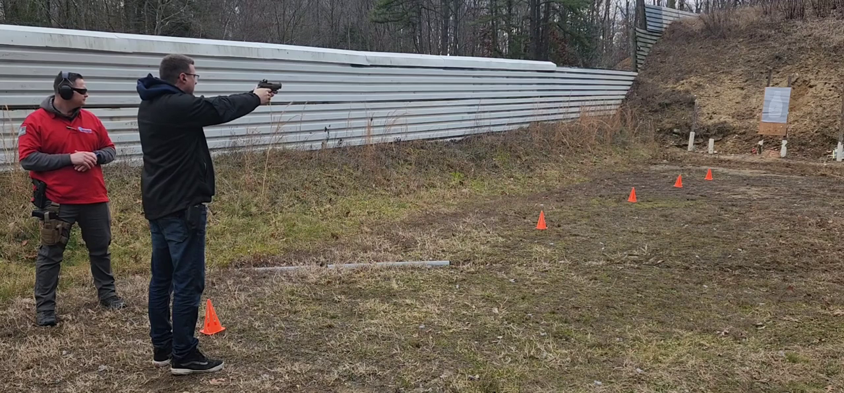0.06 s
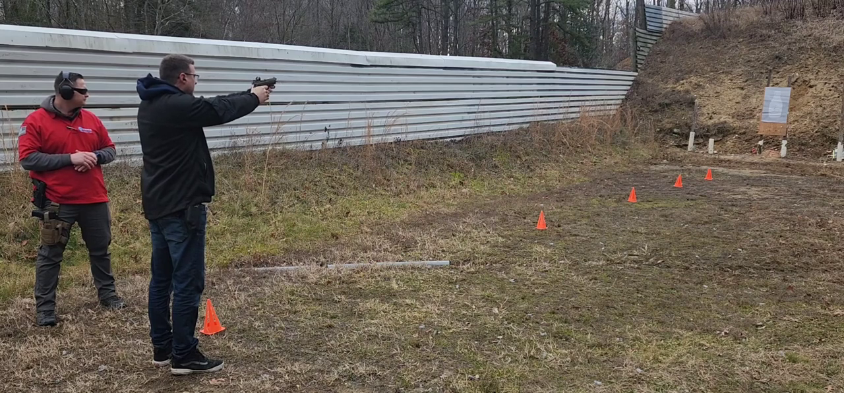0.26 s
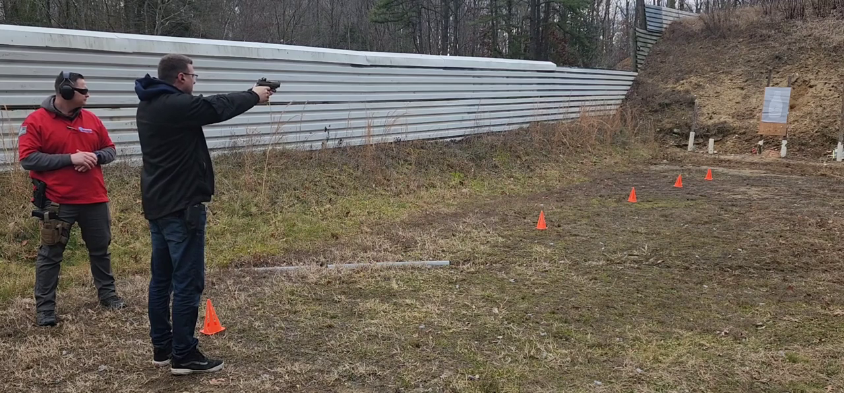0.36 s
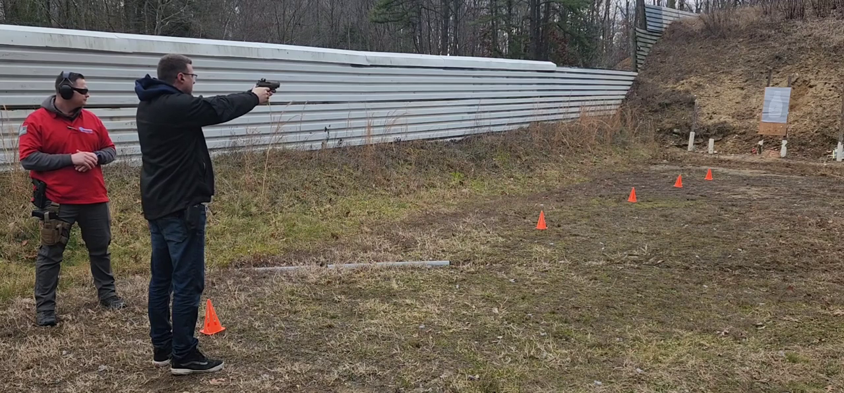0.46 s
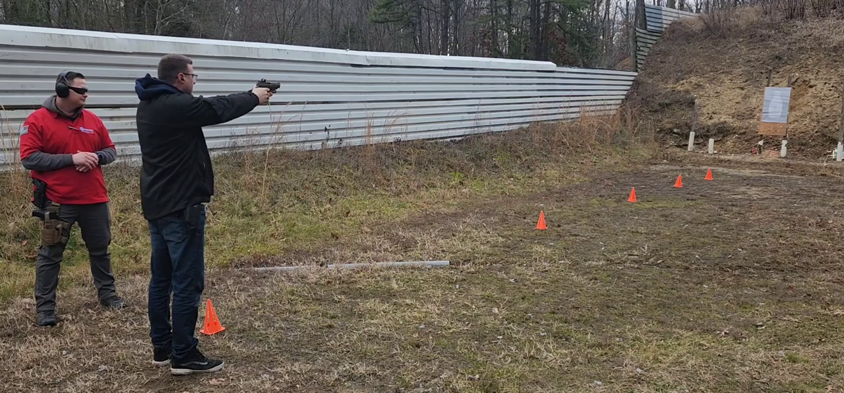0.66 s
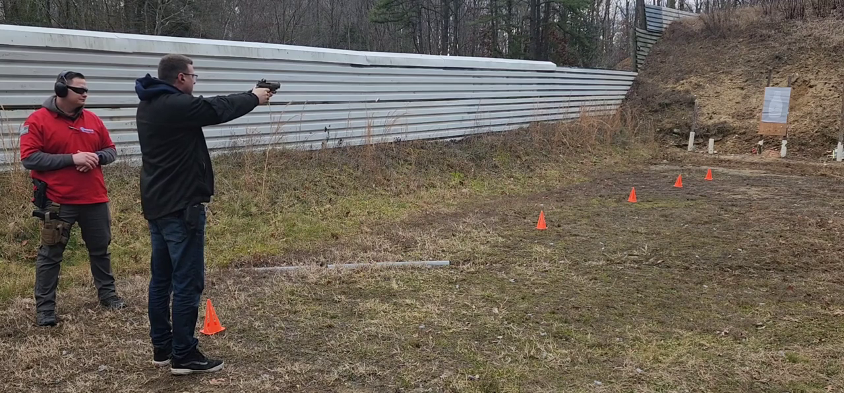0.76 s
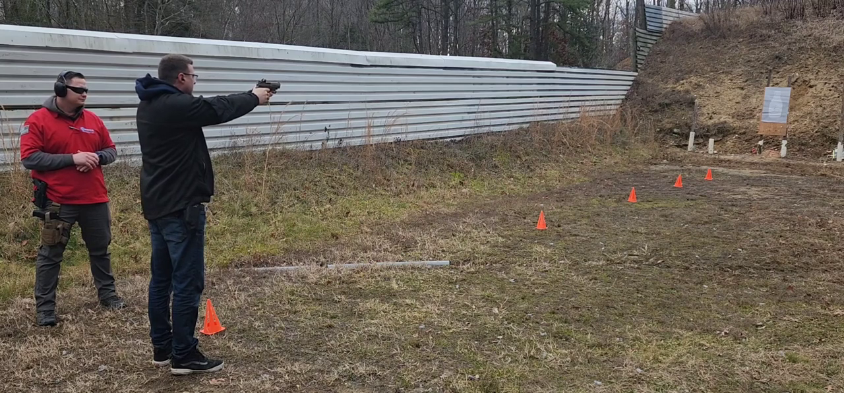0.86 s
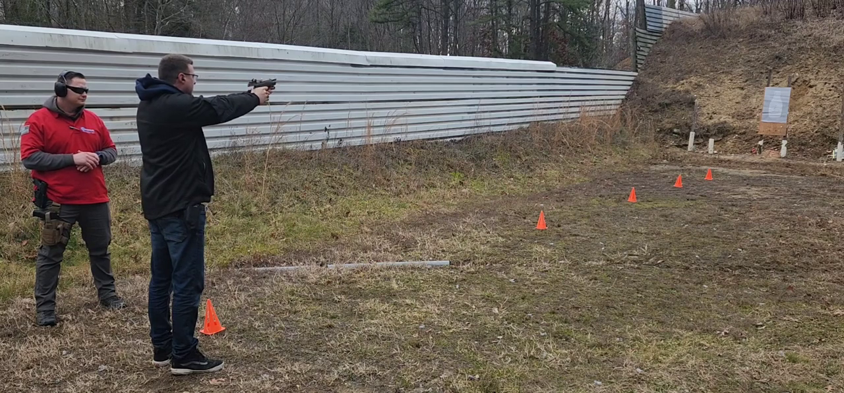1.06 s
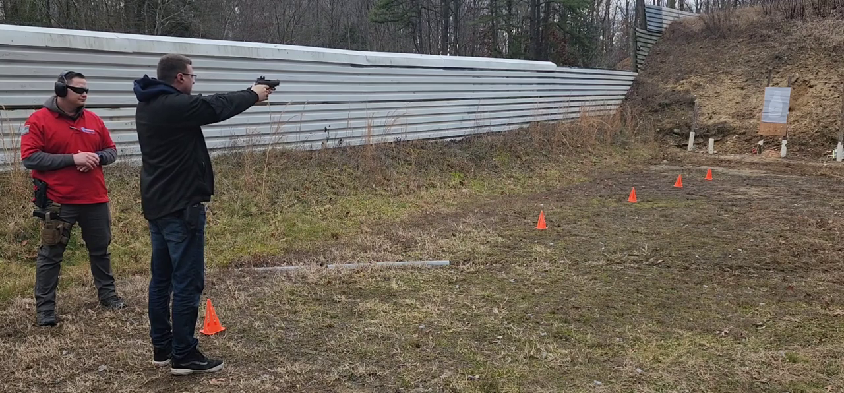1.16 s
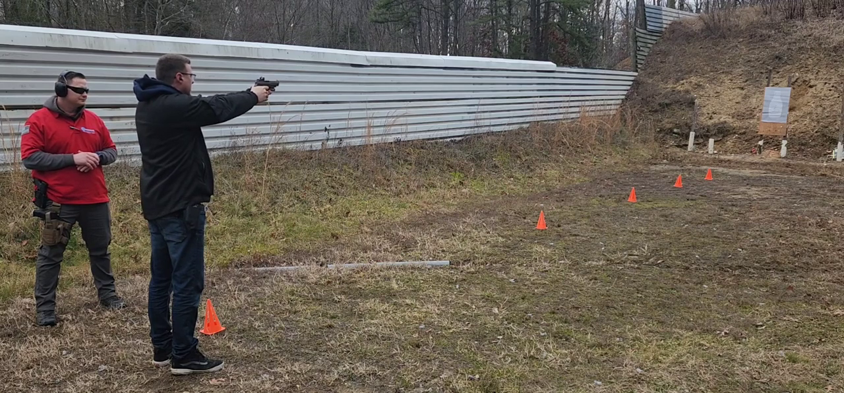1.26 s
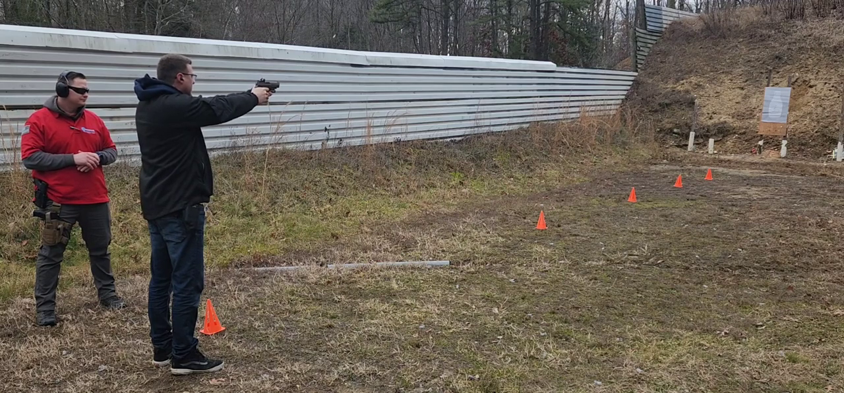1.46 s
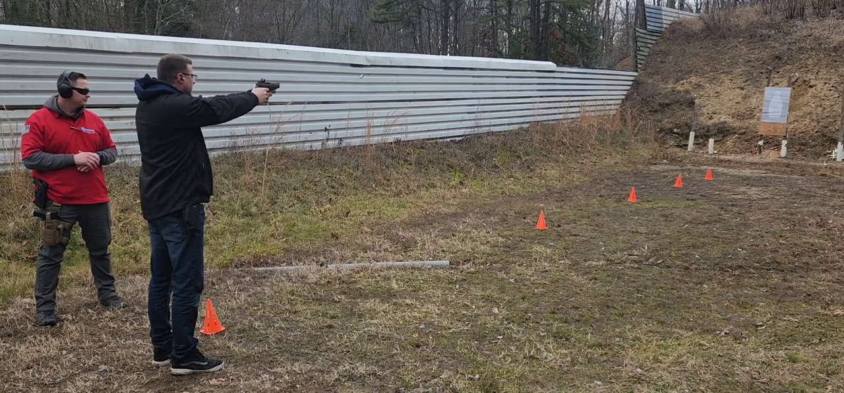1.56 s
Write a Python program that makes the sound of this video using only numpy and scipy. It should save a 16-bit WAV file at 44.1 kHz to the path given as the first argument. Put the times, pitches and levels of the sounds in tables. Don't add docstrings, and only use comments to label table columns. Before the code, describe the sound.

Two loud pistol shots crack at an outdoor range, each with a quick slapping echo and woodland tail

```python
import sys
import numpy as np
from scipy import signal
from scipy.fft import rfft, irfft, next_fast_len
from scipy.io import wavfile
from scipy.ndimage import uniform_filter1d

SR = 44100
rng = np.random.default_rng(int(sys.argv[2]) if len(sys.argv) > 2 else 0)


def attenuation_scalar(level_db):
    decades = np.asarray(level_db, float) / 20
    return 10 ** decades


def store_wav(level_fs):
    pcm = np.round(np.clip(np.atleast_2d(level_fs), -1, 1) * 32767)
    wavfile.write(sys.argv[1], SR, pcm.T.astype(np.int16))


N = 70560

# [t/s, level/dB, right-port thump level/dB, thump f/Hz]
SHOTS = [
    (-.42, 3, 11, 150),
    (0.2101, 0.5, 1, 144.3),
    (1.0369, -1, 6, 280.8),
]
# [delay t/s, level/dB, left-right level/dB, left lag t/ms, swing f/Hz]
HARD_PATHS = [(0, -4, 0, -.3, 850), (.0032, -4, 4, -.1, 1600), (.0094, -6, 9, -.3, 800),
              (.0111, -5, 5, -.3, 1600), (.012, -8, 4, -.3, 1800), (.0133, -5, 3, -.4, 1300),
              (.0157, -9, 4, -.3, 1600), (.0233, -3, -.5, -.3, 880), (.0248, -10, 3, -.3, 1000),
              (.037, -21, 5, -.3, 600), (.0575, -24, 6, -.3, 600), (.0932, -7, 1.5, .25, 1550),
              (.0938, -9, 2, .25, 4200), (.0941, -10, 2, .25, 4200), (.0945, -12, 2, .25, 1700),
              (.1033, -18, .5, .2, 3300), (.093, -23, -1, .1, 380), (.17, -33, .5, .1, 900),
              (.2705, -34, 1, .1, 600)]
FRONT, FRONT_MS, LEAD, DAMP = .5, .05, .2, .95

# [delay t/s, level/dB, rise t/s, t60 t/s, left-right level/dB]
NEAR_SURFACES = [
    (0, -13, .0002, .06, .5),
    (.009, -11, .002, .1, .5),
    (.03, -22, .002, .1, 1),
    (.05, -33, .005, .3, 1),
]
EARTH_BANK = [
    (.0932, -12.5, .0002, 0.016, 0.84),
    (.103, -19.5, .0004, 0.017, 0.64),
    (.2445, -39, .0008, .03, 4),
]
FAR_SLOPES = [
    (0.093, -25, .002, 0.19, 0.44),
    (0.166, -37.5, 0.001, 0.18, 1.1),
    (0.262, -32.5, 0.0012, 0.04, 6),
    (0.271, -38.5, 0.0086, 0.11, 4.5),
]
# [f/Hz, level/dB]
NEAR_COLOUR = [(60, -35), (300, -3), (800, -2), (1500, -9), (2100, 0), (2800, -10), (8500, -13),
               (16000, -18)]
BANK_COLOUR = [(200, -12), (1500, -2.5), (2600, -6), (4200, -3.5), (5200, -6), (7000, -4), (10500, -7.5),
               (15000, -11)]
FAR_COLOUR = [(60, -51), (300, -25), (600, -8), (1500, 1.5), (2400, -6), (4500, -11), (8500, -12),
              (16000, -40)]
NEAR_LAG, FAR_LAG = -13, 16

THUMP_S, THUMP_T60, THUMP_LEFT_DB = 0.0011, 0.011, -11
# [delay t/s, level/dB, f/Hz, t60 t/s]
BANK_BOOMS = [(.002, -30, 70, .1), (.04, -34, 90, .1), (.093, -33, 85, .07), (.172, -29, 150, .11),
              (.178, -30, 205, .09), (.2, -41, 90, .12), (.285, -43, 90, .1), (.36, -46, 95, .12)]

# [f/Hz, level/dB]
WOODS_COLOUR = [(30, -31.5), (90, -14), (170, -5.5), (800, 1), (1200, -8.5), (2200, -16.5), (7400, -32),
                (12000, -48.5)]
# [f/Hz, t60 t/s]
WOODS_DECAY = [(60, 1.2), (300, 1.6), (700, 1.7), (2000, 1.3), (5000, .9), (12000, .55)]
WOODS_DB, WOODS_RISE_S, WOODS_AT_S = -38, 0.16, 0.29
TRUNKS_DB = 2.5

# [t/s, level/dB]
CASE_FALLS = [
    (1.41, -66),
    (1.417, -78),
    (1.421, -64.5),
]
CASE_COLOUR = [(3000, -35), (8000, 12), (14000, 4), (16000, -6)]  # [f/Hz, level/dB]

# [f/Hz, level/dB]
AIR_COLOUR = [(30, -31), (200, -24.5), (570, 3), (800, -15.5), (1500, -8), (2300, -15), (5000, -31.5),
              (16000, -63)]
# [f/Hz, level/dB]
WIND_COLOUR = [(10, -12.5), (30, 4.5), (90, 0.5), (150, -23.5), (20000, -120)]
AIR_DB, WIND_DB = -56.5, -70.5
ALIKE = 0.26

# [f/Hz, level/dB]
MIC = [(20, -10), (60, 0), (9500, 0), (11000, -5), (12500, 0), (15700, 0), (16000, -30), (20000, -30)]
TOP, KNEE = 1.02, 5
# [f/Hz, level/dB]
SMEAR_BANDS = [(90, -15), (140, -12), (330, -13.5), (600, -16), (1300, -25), (2300, -39.5), (3700, -15.5),
               (4600, -14), (5200, -23.5), (6800, -21), (8500, -16), (10200, -33), (13500, -30),
               (15000, -16)]
SMEAR_S, SMEAR_HISS_DB = .034, -11


def along(points, hz):
    f, v = np.transpose(points)
    return np.interp(np.log(hz + 1), np.log(f + 1), v)


def unit(x):
    return x / np.sqrt(np.mean(x ** 2) + 1e-20)


def filtered(x, response):
    m = next_fast_len(x.shape[-1] + 8192)
    spectrum = rfft(x, m) * response(np.fft.rfftfreq(m, 1 / SR))
    return irfft(spectrum, m)[..., :x.shape[-1]]


def noise(colour, size, grain_db=0.0, lag=0):
    grain = unit(uniform_filter1d(rng.standard_normal(size), size=60))
    a, b = rng.standard_normal((2, size)) * attenuation_scalar(grain_db * grain)
    u = np.arccos(np.clip(ALIKE, -1, 1)) / 2
    left = np.roll(np.cos(u) * a + np.sin(u) * b, lag)
    right = np.cos(u) * a - np.sin(u) * b
    return unit(filtered(np.array([left, right]), lambda hz: attenuation_scalar(along(colour, hz))))


def sides(db):
    return attenuation_scalar(np.array([[db / 2], [-db / 2]]))


def swell(t, start, rise, t60):
    age = np.maximum(t - start, 0)
    return (1 - np.exp(-age / rise)) * attenuation_scalar(-60 * age / t60)


def muzzle_blast(t):
    out, near = np.zeros((2, len(t))), t[:SR // 3]
    vary = rng.standard_normal(len(HARD_PATHS))
    for (s, db, pan_db, lag, hz), v in zip(HARD_PATHS, vary):
        since = near - s - .0002 - np.array([[.5], [-.5]]) * lag / 1000
        age = np.maximum(since, 0)
        u = LEAD + 2 * hz * age * DAMP
        swing = np.cos(2 * np.pi * hz * since) * u ** 2 * np.exp(2 - 2 * u)
        front = FRONT * np.exp(-age * 1000 / FRONT_MS)
        out[:, :len(near)] += attenuation_scalar(db + .7 * v) * sides(pan_db) * (swing + front) * (since >= 0)
    return out


def port_thump(t, db, hz):
    push = attenuation_scalar(db) * swell(t, THUMP_S, 0.0009, THUMP_T60) * np.sin(2 * np.pi * hz * (t - THUMP_S))
    return push * attenuation_scalar(np.array([[THUMP_LEFT_DB], [0]]))


def scatter(t, surfaces, colour, lag):
    power = 0
    for s, db, rise, t60, pan_db in surfaces:
        power = power + attenuation_scalar(db) ** 2 * sides(pan_db) ** 2 * swell(t, s, rise, t60) ** 2
    return np.sqrt(power) * noise(colour, len(t), 1.5, lag)


def bank_booms(t):
    out = 0
    vary = rng.standard_normal((len(BANK_BOOMS), 2))
    for (s, db, hz, t60), (a, b) in zip(BANK_BOOMS, vary):
        tone = np.sin(2 * np.pi * hz * (1 + 0.026 * b) * (t - s))
        out = out + attenuation_scalar(db + 1.5 * a) * swell(t, s, 0.0052, t60) * tone
    return out


def woods(t):
    trunks = noise(WOODS_COLOUR, len(t), grain_db=TRUNKS_DB, lag=FAR_LAG)
    hz, s, z = signal.stft(trunks, SR, nperseg=256)
    decay = attenuation_scalar(-60 * (s - WOODS_AT_S) / along(WOODS_DECAY, hz)[:, None])
    tail = signal.istft(z * decay, SR, nperseg=256)[1][:, :len(t)]
    return attenuation_scalar(WOODS_DB) * tail * (1 - np.exp(-(t / WOODS_RISE_S) ** 2))


def cases():
    t = np.arange(N) / SR
    shape = sum(attenuation_scalar(db) * swell(t, s, .0005, 0.036) for s, db in CASE_FALLS)
    return shape * noise(CASE_COLOUR, N)


def still_air():
    return attenuation_scalar(AIR_DB) * noise(AIR_COLOUR, N)


def wind():
    return attenuation_scalar(WIND_DB) * noise(WIND_COLOUR, N)


def scene():
    out, t = np.zeros((2, 4 * SR)), np.arange(2 * SR) / SR
    for s, db, thump_db, thump_hz in SHOTS:
        at = round((s + 1) * SR)
        shot = muzzle_blast(t) + port_thump(t, thump_db, thump_hz)
        shot += scatter(t, NEAR_SURFACES, NEAR_COLOUR, NEAR_LAG)
        shot += scatter(t, EARTH_BANK, BANK_COLOUR, FAR_LAG)
        shot += scatter(t, FAR_SLOPES, FAR_COLOUR, FAR_LAG)
        shot += bank_booms(t) + woods(t)
        out[:, at:at + len(t)] += attenuation_scalar(db) * shot[:, :4 * SR - at]
    return out[:, SR:SR + N] + cases() + still_air() + wind()


def band_limit(x):
    return signal.sosfilt(signal.butter(12, 16970, fs=SR, output="sos"), x)


def record(dry):
    squashed = dry / (1 + np.abs(dry / TOP) ** KNEE) ** (1 / KNEE)
    x = filtered(squashed, lambda hz: attenuation_scalar(along(MIC, hz)))
    t = np.arange(round(SMEAR_S * SR)) / SR
    fade = np.cos(np.pi * t / SMEAR_S / 2) ** 2
    bands = attenuation_scalar(SMEAR_HISS_DB) * rng.standard_normal((2, len(t)))
    turns = rng.uniform(0, 2 * np.pi, (len(SMEAR_BANDS), 2, 1))
    for (hz, db), turn in zip(SMEAR_BANDS, turns):
        bands += attenuation_scalar(db) * np.sin(2 * np.pi * hz * t + turn)
    ahead = (bands * fade / fade.sum() * 6)[:, ::-1]
    smear = signal.fftconvolve(x, ahead, axes=1)[:, len(t) - 1:][:, :N]
    return band_limit(x + smear)


dry = scene()
out = record(dry)
store_wav(out)
```